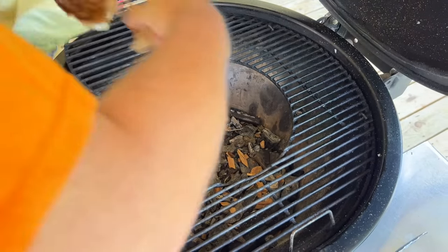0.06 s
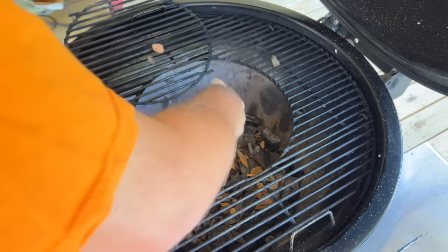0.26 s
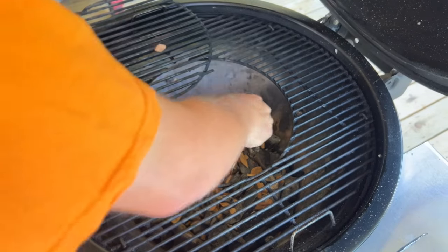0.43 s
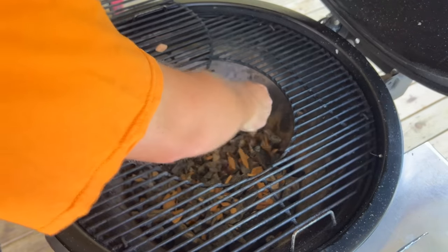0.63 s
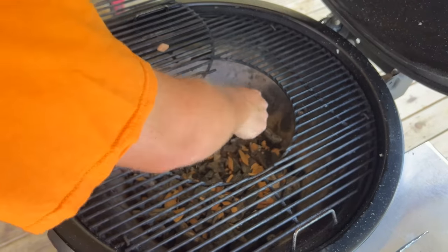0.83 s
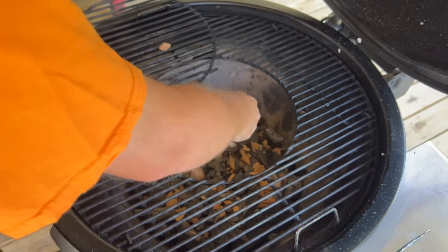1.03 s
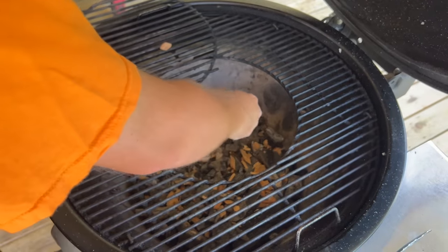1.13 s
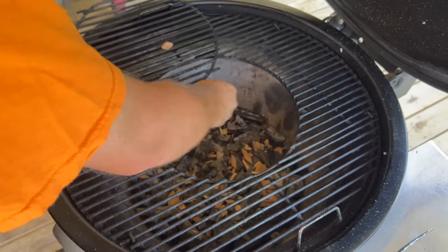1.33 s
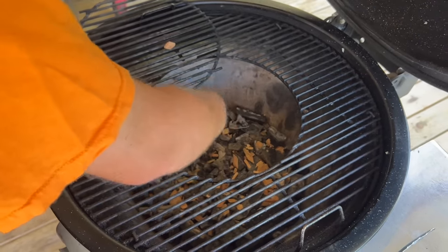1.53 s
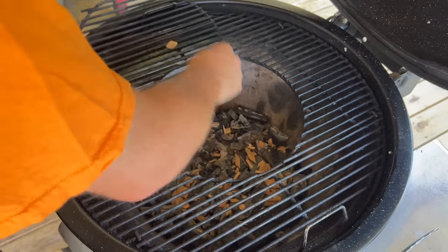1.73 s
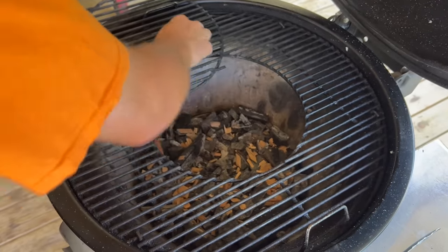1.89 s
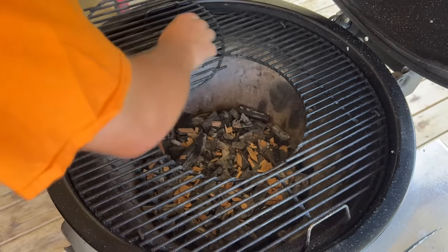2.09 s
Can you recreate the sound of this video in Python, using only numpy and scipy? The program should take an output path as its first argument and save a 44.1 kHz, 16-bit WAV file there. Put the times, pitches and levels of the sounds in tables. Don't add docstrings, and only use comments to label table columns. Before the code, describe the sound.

Dry wood chips fall onto charcoal in a metal kettle grill, heard close from above outdoors. Fingers rustle, the grate clinks early, then chips tick and crack, thinning out before a soft final thud.

```python
import sys
import numpy as np
from scipy import signal
from scipy.fft import rfft, irfft, next_fast_len
from scipy.io import wavfile
from scipy.ndimage import uniform_filter1d

SR = 44100
rng = np.random.default_rng(int(sys.argv[2]) if len(sys.argv) > 2 else 0)


def invert_db(level):
    return 10 ** (np.asarray(level, dtype=float) / 20)


def digitize_waveform(pressure):
    field = np.atleast_2d(pressure).T
    bounded = np.clip(field, -1, 1)
    quanta = np.round(bounded * 32767).astype(np.int16)
    wavfile.write(sys.argv[1], SR, quanta)


N = 94815
T = np.arange(N) / SR
SIZE = next_fast_len(N + SR // 2)
FREQ = np.maximum(np.arange(SIZE // 2 + 1) * SR / SIZE, 1)
OPPOSITE = np.array([[1], [-1]])


def table(tab):
    tab = np.array(tab)
    return np.interp(np.log(FREQ), np.log(tab[:, 0]), tab[:, 1])


def shape(x, gain):
    return irfft(rfft(x, SIZE) * gain, SIZE)[..., :N]


def unit(x):
    return x / np.sqrt(np.mean(x ** 2))


def peak(x):
    return x / np.abs(x).max()


def fade(t60, start=0.):
    return (T >= start) * np.exp(-np.log(1000) * np.maximum(T - start, 0) / t60)


def hold_then_fade(end, t60):
    return np.minimum(1, fade(t60, end) + (T < end))


def ring(x, hz, t60):
    pole = np.exp((2j * np.pi * hz - np.log(1000) / t60) / SR)
    return signal.lfilter([1], [1, -pole], x).imag


def walk(rate):
    k = int(SR / rate)
    steps = np.repeat(rng.standard_normal(N // k + 1), k)
    return unit(uniform_filter1d(uniform_filter1d(steps, k), k)[:N])


# frequency in Hz, likeness from 0 to 1.
PORT_LIKENESS = [(60, .97), (300, .9), (700, .5), (3000, .55), (7500, .6), (9300, .998), (11000, .998),
                 (12500, .95)]


def wide(colour):
    like = np.clip(table(PORT_LIKENESS), 0, 1)
    mid, side = rng.standard_normal((2, N))
    mid = shape(mid, colour * np.sqrt(1 + like))
    return mid + OPPOSITE * shape(side, colour * np.sqrt(1 - like))


# frequency in Hz, level in dB per Hz.
BOWL_COLOUR = [(250, -30.5), (1550, -16.5), (2000, -5), (3300, -3.5), (4600, -13), (6000, -7),
               (9000, -14.5), (16000, -20)]
BOWL_T60_S, BOWL_TREBLE_T60_S, BOWL_RISE_S = 0.2, 0.11, 0.0032


def bowl(push):
    low = 1 / (1 + (FREQ / 4500) ** 4)
    echo = shape(wide(0.98) * fade(BOWL_T60_S), low)
    echo = echo + shape(wide(0.55) * fade(BOWL_TREBLE_T60_S), 1 - low)
    echo = shape(echo * np.minimum(T / BOWL_RISE_S + 0.5, 1), invert_db(table(BOWL_COLOUR)))
    return shape(push, rfft(peak(echo), SIZE))


# frequency in Hz, level in dB per Hz.
YARD_COLOUR = [(25, -39), (50, -2.5), (150, -3), (350, -12), (700, -17.5), (2700, -29), (8000, -36.5),
               (16000, -46.5)]
YARD_DB = -53.5
HUM_HZ, HUM_WIDTH_HZ, HUM_DB = 54, 8, -56


def yard():
    base, air = wide(invert_db(table(YARD_COLOUR))), 0
    for k in range(11):
        octave = np.clip(1 - np.abs(np.log2(FREQ / 20) - k), 0, 1)
        air = air + shape(base, octave) * invert_db(walk(8))
    hum = wide(1 / (1 + ((FREQ - HUM_HZ) * 2 / HUM_WIDTH_HZ) ** 2))
    return invert_db(YARD_DB) * unit(air) + invert_db(HUM_DB + 2 * walk(5.7)) * unit(hum)


# start in seconds, length in seconds, level in dB, dullness 0 to 1.
SCRAPES = [(0, 0.066, -43.5, 0.68), (0.096, 0.095, -50, 0.43), (0.208, 0.25, -47, 0.54),
           (0.329, .004, -61, 0.6), (1.071, 0.005, -45, 0.52), (0.364, 0.03, -40, 0.23),
           (0.426, 0.14, -47.5, 0.41), (0.593, 0.14, -49, 0.25), (0.741, 0.13, -50.5, 0.04),
           (0.902, 0.082, -59.5, 0.56), (0.992, 0.22, -53, 0.59), (1.211, 0.054, -49, 0.47),
           (1.274, 0.078, -57.5, 0.83), (1.35, 0.064, -55, 0.14), (1.445, 0.2, -70.5, 0.77),
           (1.599, 0.032, -47.5, 0.47), (1.635, 0.016, -48, 1), (1.651, 0.027, -49.5, 0.08),
           (1.68, 0.022, -46.5, 0.58), (1.715, 0.023, -53.5, 0.36), (1.956, 0.069, -53, 0.99)]
# frequency in Hz, level in dB per Hz.
RUSTLE_BRIGHT = [(200, 6), (1000, -13.5), (2700, -0.5), (5000, 0.5), (8000, -2.5), (10000, 6),
                 (13000, -7.5), (16000, -0.5)]
RUSTLE_DULL = [(100, -22), (300, 2), (900, -1.5), (2500, -11), (5000, -27), (16000, -42)]
SCRAPE_ATTACK_S, SCRAPE_T60_S = 0.0007, 0.16
GRAINS_PER_S, GRAIN_SCATTER_DB, GRAIN_TAIL_S = 1000, 3.2, .02
CRUMBS_PER_S, CRUMB_DB, CRUMB_T60_S = 30, -2, .015


def rustle():
    scatter = invert_db(GRAIN_SCATTER_DB * np.minimum(rng.exponential(size=N), 3))
    grains = (rng.random(N) < GRAINS_PER_S / SR) * scatter
    decay = np.exp(-2 * np.log(1000) / GRAIN_TAIL_S / SR)
    grain_env = unit(np.sqrt(signal.lfilter([1], [1, -decay], grains ** 2)))
    bright, dull = np.zeros((2, N))
    for t0, length, db, dullness in SCRAPES:
        end, share = t0 + length, np.clip(dullness, 0, 1)
        stroke = np.clip((T - t0) / SCRAPE_ATTACK_S, 0, 1) * (fade(SCRAPE_T60_S, end) + (T < end))
        power = invert_db(2 * db) * stroke ** 2
        bright = bright + power * (1 - share)
        dull = dull + power * share
    rubbing = np.sqrt(bright) * unit(wide(invert_db(table(RUSTLE_BRIGHT))))
    rubbing = rubbing + np.sqrt(dull) * unit(wide(invert_db(table(RUSTLE_DULL))))
    out = invert_db(2 * walk(39.97)) * grain_env * rubbing
    for hz in 1800 * 1.2 ** np.arange(8):
        hits = (rng.random(N) < CRUMBS_PER_S / SR) * rng.standard_normal((2, N)) * np.sqrt(bright)
        out = out + invert_db(CRUMB_DB) * ring(hits, hz, CRUMB_T60_S * 4000 / hz)
    return out


# start in seconds, level in dB, rise in seconds, high modes in dB.
THUDS = [
    (0.235, -38.5, 0.013, -21),
    (1.959, -37.5, 0.013, 2),
]
# frequency in Hz, level in dB, t60 in seconds.
KETTLE = [(149, 3.5, 0.15), (202.7, -5.5, 0.43), (319.4, -6, 0.39), (602, -21, .2), (712, -13, 0.46),
          (832, -23, 0.17), (1010, -27, .3), (1250, -15.5, 0.15), (1580, -17.5, 0.2), (2060, -22, 0.12),
          (2270, -15, 0.33), (3480, -25, 0.55), (5080, -26, 0.31)]


def kettle_thuds():
    out, noise = np.zeros(N), rng.standard_normal(N)
    for t0, db, rise, high_db in THUDS:
        swell = np.sin(np.pi * np.clip((T - t0) / rise / 2, 0, 1))
        blow = noise * swell / np.sqrt(rise * SR)
        for hz, mode_db, t60 in KETTLE:
            level = invert_db(db + mode_db + high_db * (hz > 400))
            out += level * peak(ring(blow, hz, t60))
    return out


def bars(push, modes):
    out = 0
    for hz, db, t60 in modes:
        twin = ring(push, hz * 1.0063, t60 / 2)
        pair = ring(push, hz, t60) + .5 * twin * np.array([[1], [-.5]])
        out = out + peak(pair) * invert_db(db + rng.standard_normal((2, 1)))
    return shape(out, 1 / (1 + (250 / FREQ) ** 4))


# frequency in Hz, level in dB, t60 in seconds.
FLAP = [(379, 2, .35), (1000, -0.5, 0.44), (1500, -2, 0.072), (1950, 2.5, 0.12), (2595, -16, 0.19),
        (3040, -6, 0.41)]


def flap():
    rattle = rng.standard_normal(N) * fade(.03, .1945)
    return invert_db(-37.5) * bars(rattle, FLAP)


# start in seconds, level in dB, dull above in Hz, rattle t60 in seconds.
KNOCKS = [
    (0.2223, -36, 5930, 0.012),
    (0.229, -28.5, 6400, 0.017),
    (.252, -34, 5000, 0.045),
    (.279, -38, 4700, 0.03),
    (0.309, -41.5, 3900, 0.033),
]
# frequency in Hz, level in dB, t60 in seconds.
GRATE_MODES = [(330, -9.5, 0.57), (676, -25, 0.54), (963, -13, 0.54), (1138, 0.5, 0.2), (1292, -18, 0.66),
               (1424, 5, 0.19), (1470, -6.5, 0.31), (1537, 1.5, 0.24), (1850, 4.5, 0.15), (1891, 6.5, 0.18),
               (2090, -2, 0.21), (2203, -2, 0.24), (2280, 0, 0.26), (2592, -8.5, 0.38),
               (1990, -24, 0.11), (2194, -10, 0.29), (3026, -11.5, 0.32), (3900, -24, .4), (5010, -20, 0.18),
              (4860, -7.5, 0.23), (5200, -7, 0.14), (6729, -21.5, 0.74)]
GRATE_DB, GRATE_ECHO_DB = -31.5, 3.5


def grate():
    push, noise = np.zeros(N), rng.standard_normal(N)
    for t0, db, dull_hz, rattle in KNOCKS:
        blow = shape(noise * fade(rattle, t0), 1 / (1 + 1j * FREQ / dull_hz) ** 2)
        push += invert_db(db) * blow / np.sqrt(rattle * SR / 14)
    clink = bars(push, GRATE_MODES)
    return invert_db(GRATE_DB) * clink + invert_db(GRATE_ECHO_DB) * bowl(push)


# start in seconds, level in dB, pitch in Hz, length in seconds.
PINGS = [
    (0.369, -44, 5830, 0.03),
    (0.37, -45, 4010, 0.022),
    (0.509, -33, 5080, 0.0025),
    (0.532, -40.5, 5790, 0.0028),
    (1.665, -60, 5200, 0.041),
]


def pings():
    out, rough = np.zeros(N), .55 * walk(500)
    for t0, db, hz, length in PINGS:
        tone = np.sin(2 * np.pi * hz * T + rough) * invert_db(2 * walk(300))
        attack = np.clip((T - t0) / 0.00067, 0, 1)
        out += invert_db(db) * tone * attack * hold_then_fade(t0 + length, .06)
    return out


# start in seconds, peak in dB, bright above in Hz, t60 in seconds, rise in seconds.
SNAPS = [(0.1341, -44, 2000, 0.0059, .0005), (0.362, -26, 4000, 0.0074, 0.00057),
         (0.438, -29, 7000, .015, 0.00058), (0.6044, -34.5, 3000, 0.0098, 0.0011),
         (0.6573, -21.5, 1500, 0.0044, 0.00057), (0.804, -37.5, 5100, 0.024, .004),
         (.8348, -45, 4000, 0.013, 0.0022), (.847, -41.5, 5000, .02, 0.006), (.863, -44, 5000, 0.013, .002),
         (0.9526, -20, 11900, 0.0065, 0.0021), (1.0067, -32, 6900, 0.0049, 0.00034),
         (1.037, -49, 11000, 0.0097, .001), (1.069, -34, 7940, 0.029, 0.0013),
         (1.162, -41, 5040, 0.0091, 0.00039), (1.2204, -40, 8000, 0.018, 0.0008),
         (1.232, -40, 8000, .012, .001), (1.3557, -41.5, 6000, 0.017, .001),
         (1.366, -43, 8000, 0.011, .001), (1.4017, -45, 6000, 0.022, 0.0011),
         (1.5551, -47, 5950, 0.018, 0.00034), (1.6514, -51, 3940, .015, .001),
         (1.6674, -38, 4000, .015, 0.0011), (1.687, -49, 2000, .012, .001)]


def snaps(grit):
    out = np.zeros((2, N))
    for t0, db, hz, t60, rise in SNAPS:
        here = slice(int(t0 * SR), int(t0 * SR) + 2048)
        highpass = signal.butter(2, hz, "high", fs=SR, output="sos")
        crack = signal.sosfilt(highpass, grit[:, here])
        age = T[here] - t0
        decay = invert_db(-60 * np.maximum(age - rise, 0) / t60)
        out[:, here] += invert_db(db) * crack * np.clip(age / rise, 0, 1) * decay
    return out


# start in seconds, level in dB.
BOWL_PUSHES = [(0.4537, -22.5), (.463, -18.5), (0.498, -30.5), (.772, -46.5), (.902, -33.5), (.915, -41.5),
               (0.929, -48.5), (1.032, -44), (1.045, -46), (1.21, -46.5), (1.225, -44), (1.31, -49),
               (1.36, -50.5)]
# start in seconds, peak in dB, ring in Hz, bowl echo in dB, ring in dB.
CHIPS = [(0.0512, -47, 3040, 4, 4), (0.0988, -44, 2720, 3, 6), (0.152, -50.5, 5240, 4, 4),
         (0.36, -25, 2260, -5.5, -9), (0.449, -14.5, 1900, 6.5, -19), (0.605, -42, 2840, 1, -32),
         (0.6356, -32.5, 3410, -4, -8), (0.6602, -23, 1930, -10.5, -21), (0.7019, -23, 7580, -15.5, -17),
         (0.7578, -31, 5220, -26, -14.5), (0.8072, -34, 7850, -29, -14.5), (0.8497, -32, 5420, -26, -6),
         (0.8886, -26.5, 7850, -9, -15), (0.9534, -31, 4650, -12, -12), (1.006, -36.5, 1850, 3.5, -13),
         (1.0612, -26, 2640, -14.5, -22), (1.132, -33.5, 2860, -30, -16), (1.1624, -44.5, 1870, 1, -23),
         (1.218, -40, 3190, -3, -3), (1.2447, -27, 3300, -18, -17), (1.281, -48.5, 2950, 10, 12.5),
         (1.3488, -42.5, 2740, -1, -3), (1.5176, -47, 8950, -11, -6), (1.5555, -52, 8060, -20, 1),
         (1.6024, -40.5, 1930, 0.5, -31)]
# frequency in Hz, level in dB per Hz.
TICK_COLOUR = [(300, -41), (1000, -1), (2500, -8), (6000, -2), (8000, -1), (10000, 12.5), (13500, -7.5),
               (16000, 2)]
TICK_T60_S, RING_T60_S = 0.029, 0.032


def chips():
    grit = unit(wide(invert_db(table(TICK_COLOUR))))
    out, push = np.zeros((2, N)), np.zeros(N)
    wobble = invert_db(4.5 * walk(700))
    rough = 1.1 * walk(500)
    for t0, db, hz, echo_db, ring_db in CHIPS:
        out += invert_db(db) * fade(TICK_T60_S, t0) * grit / 2
        note = np.sin(2 * np.pi * hz * (T - t0) + rough) * wobble
        out += invert_db(db + ring_db) * fade(RING_T60_S, t0) * note
        push[int(t0 * SR)] += invert_db(db + echo_db)
    for t0, db in BOWL_PUSHES:
        push[int(t0 * SR)] += invert_db(db)
    return out + snaps(grit) + bowl(push)


def scene():
    return yard() + rustle() + kettle_thuds() + flap() + grate() + pings() + chips()


def roll_off(x):
    return signal.sosfilt(signal.butter(12, 16620, fs=SR, output="sos"), x)


# frequency in Hz, level in dB.
LEFT_DB = [(60, 2), (380, 1.5), (1300, -4), (2400, -1), (4400, 7), (7500, 3), (9000, 0)]
# frequency in Hz, lead in radians.
LEFT_LEADS = [(20, 0), (1400, .4), (2100, .6), (3900, 1.5), (6200, -.4), (7600, -.3), (8600, -1.6),
              (9200, -3.12), (11100, -3.16), (11900, -6.1), (14700, -6.5), (15600, -9.2)]
DIP_S, DIP_FADE_S, DIP_DB = 1.197, .018, -15


def record(dry):
    half = OPPOSITE / 2
    balance = invert_db(half * table(LEFT_DB)) * np.exp(1j * half * table(LEFT_LEADS))
    band = (FREQ < 16300) / (1 + (39.8 / FREQ) ** 4)
    ports = shape(dry, balance * band)
    dip = invert_db(DIP_DB * np.clip(1 - np.abs(T - DIP_S) / DIP_FADE_S, 0, 1))
    return roll_off(ports * dip)


dry = scene()
out = record(dry)
digitize_waveform(out)
```